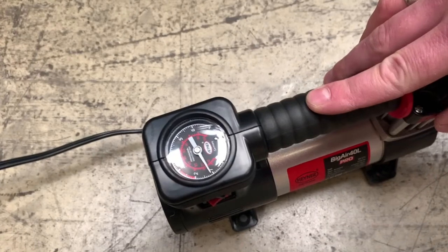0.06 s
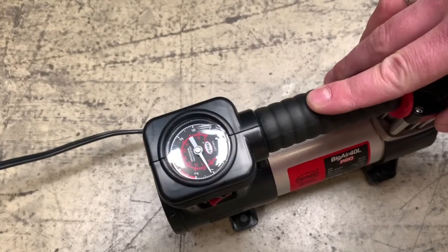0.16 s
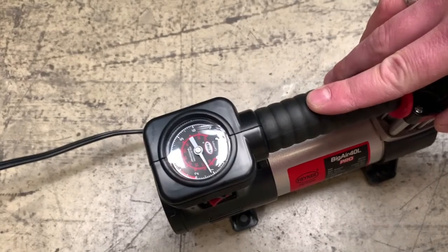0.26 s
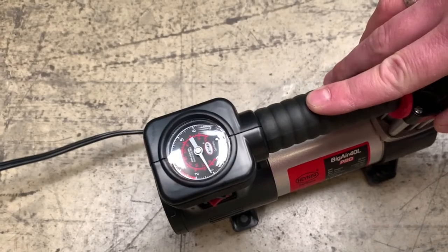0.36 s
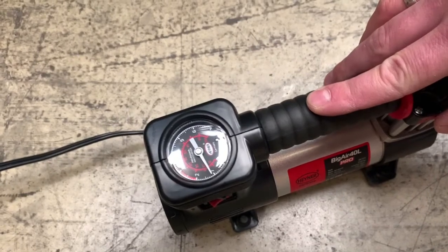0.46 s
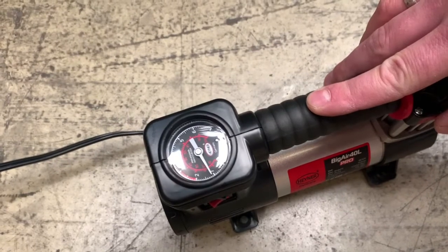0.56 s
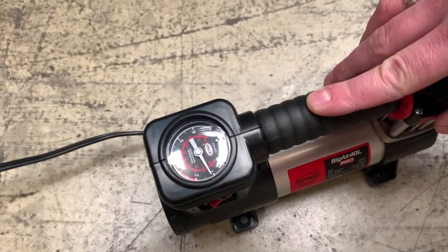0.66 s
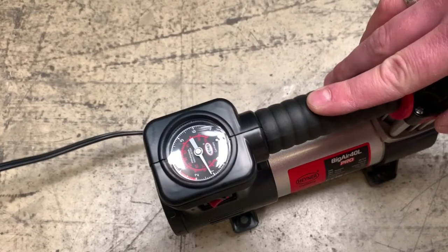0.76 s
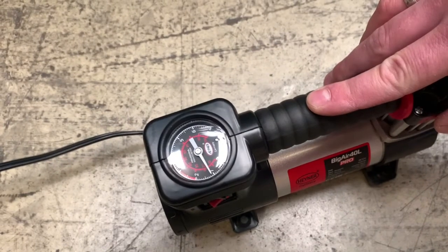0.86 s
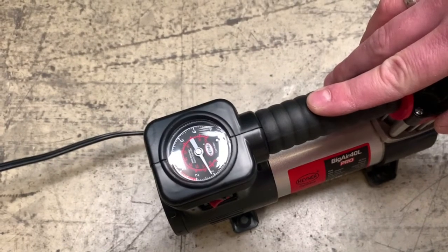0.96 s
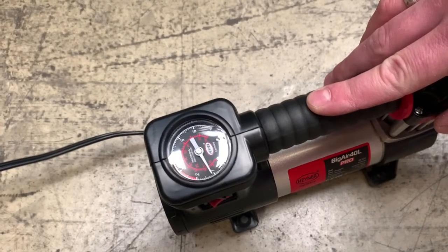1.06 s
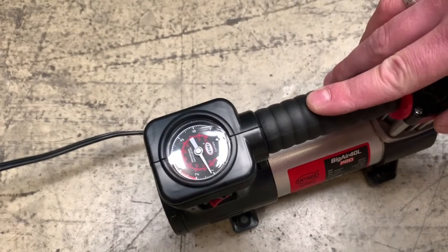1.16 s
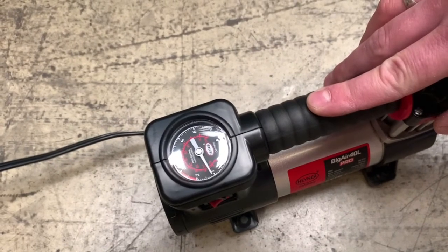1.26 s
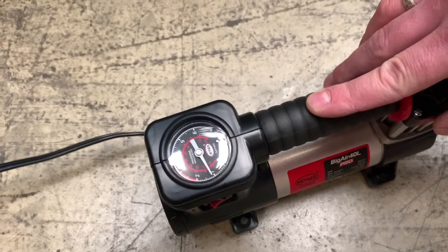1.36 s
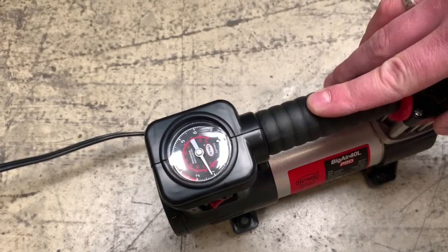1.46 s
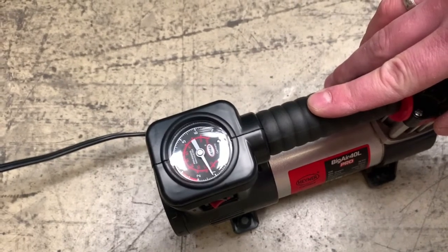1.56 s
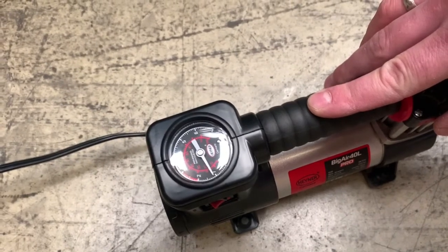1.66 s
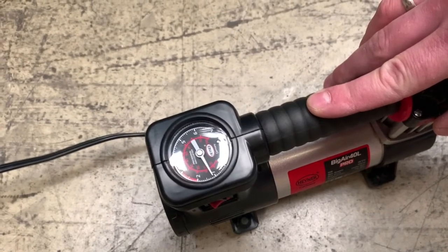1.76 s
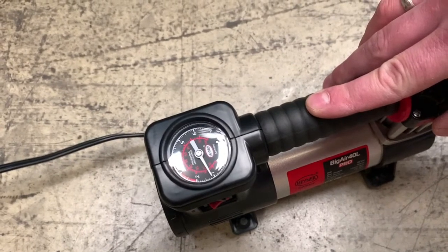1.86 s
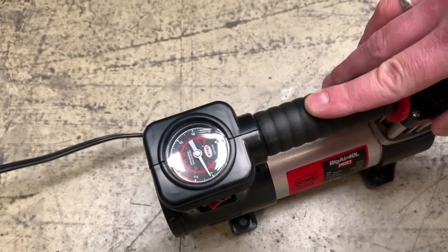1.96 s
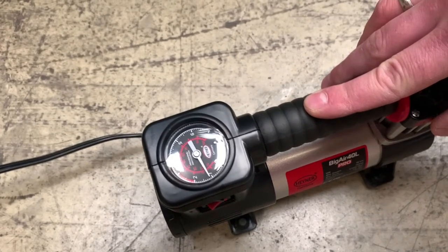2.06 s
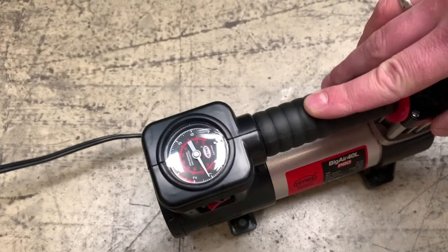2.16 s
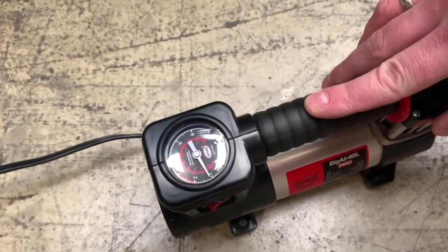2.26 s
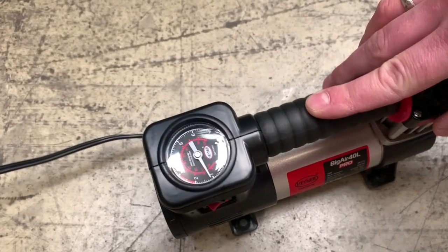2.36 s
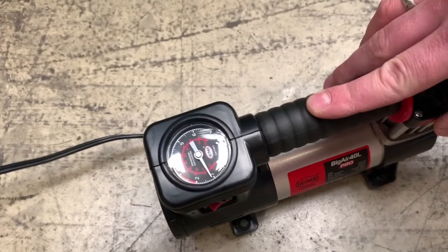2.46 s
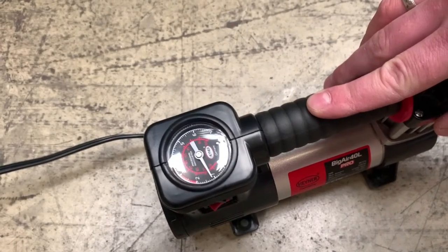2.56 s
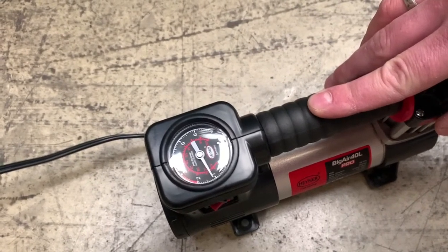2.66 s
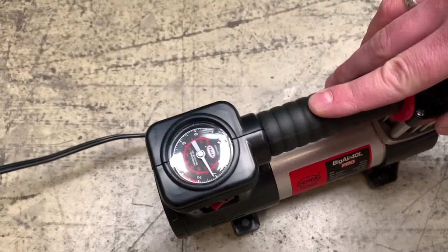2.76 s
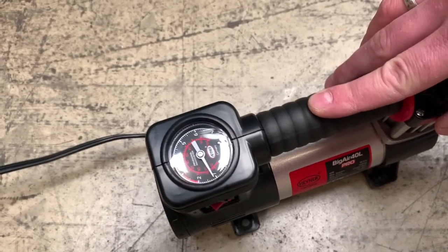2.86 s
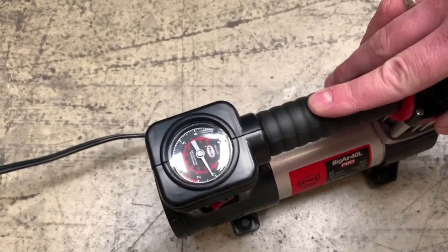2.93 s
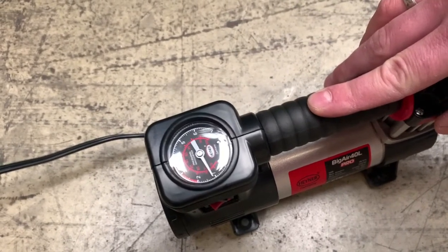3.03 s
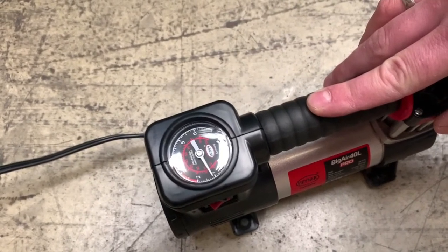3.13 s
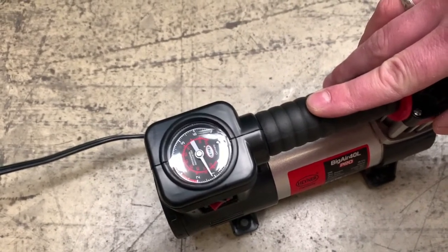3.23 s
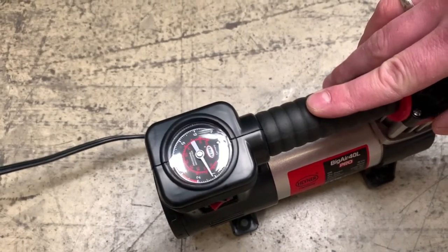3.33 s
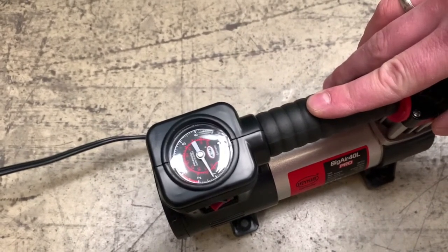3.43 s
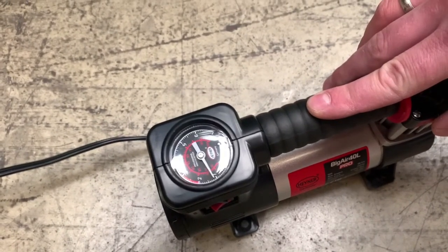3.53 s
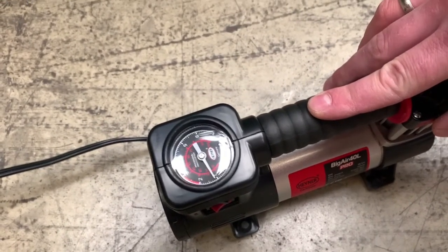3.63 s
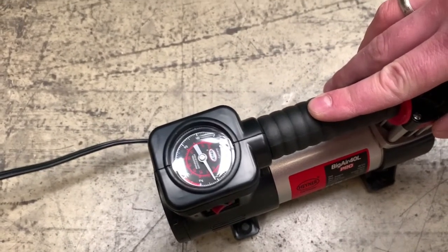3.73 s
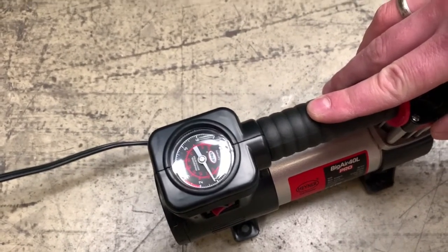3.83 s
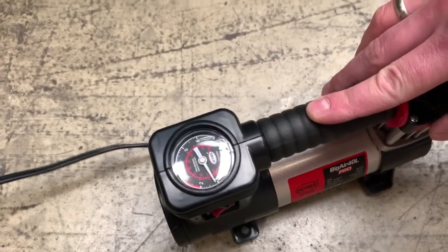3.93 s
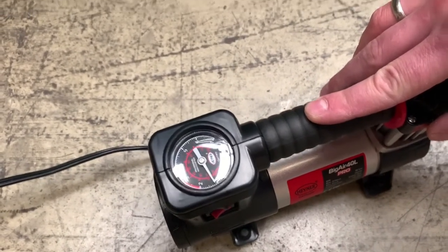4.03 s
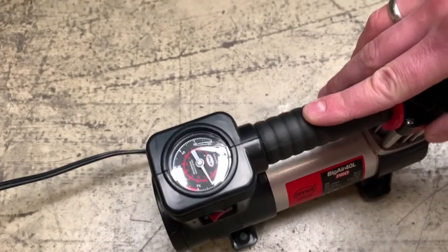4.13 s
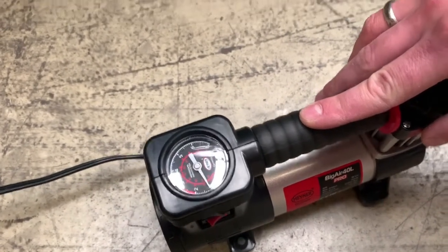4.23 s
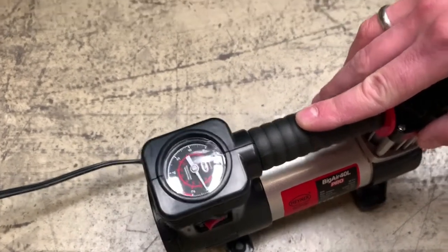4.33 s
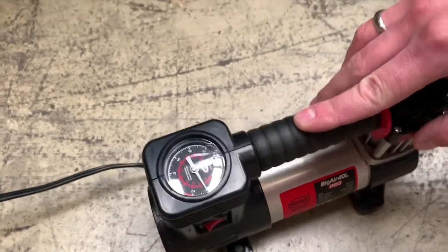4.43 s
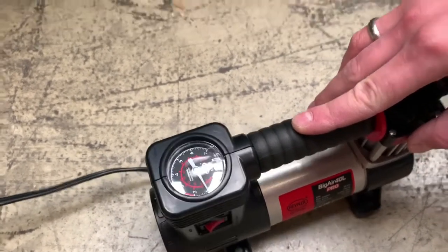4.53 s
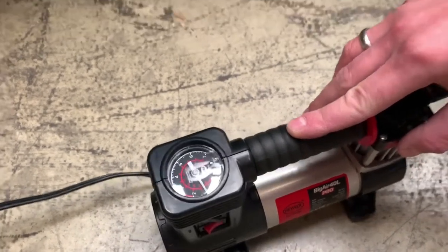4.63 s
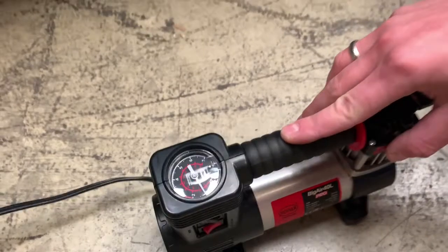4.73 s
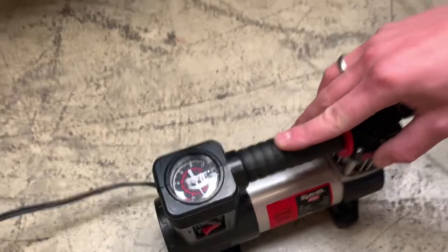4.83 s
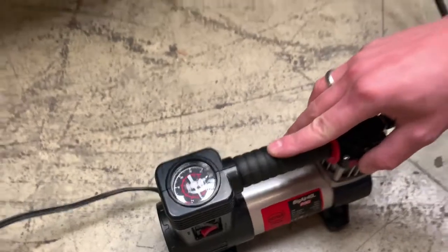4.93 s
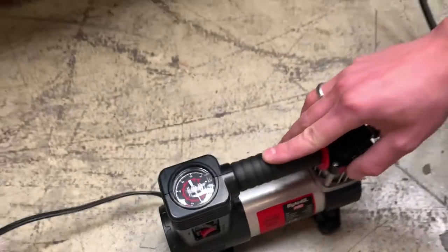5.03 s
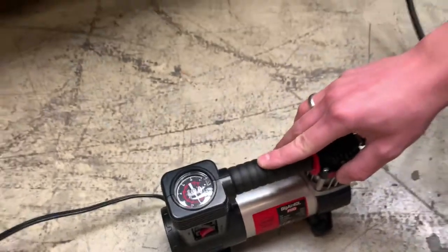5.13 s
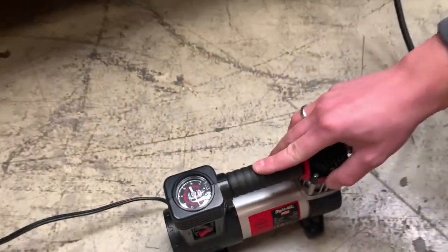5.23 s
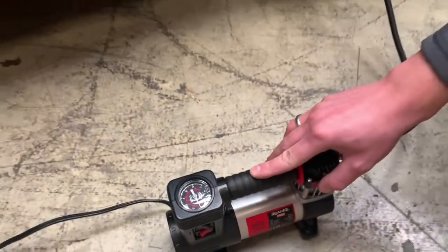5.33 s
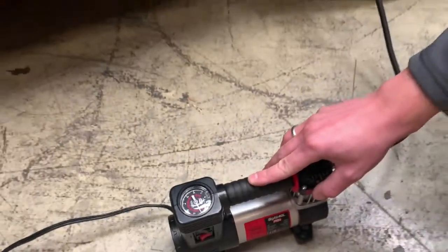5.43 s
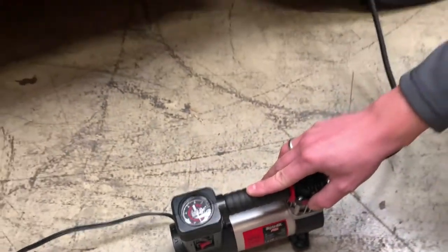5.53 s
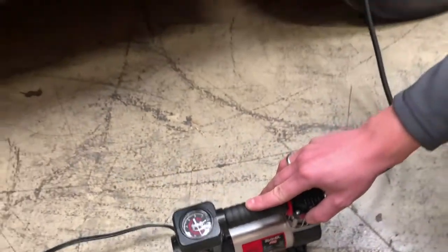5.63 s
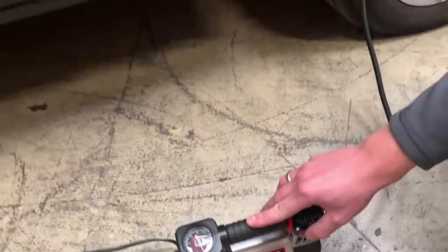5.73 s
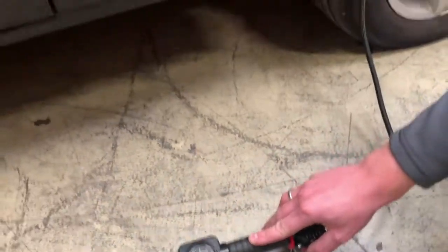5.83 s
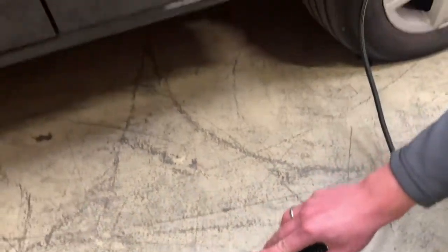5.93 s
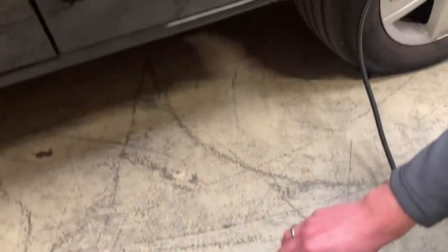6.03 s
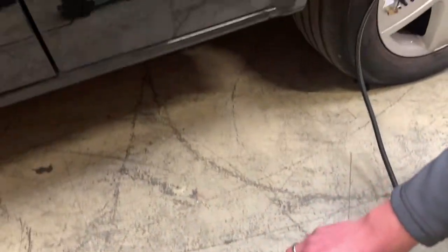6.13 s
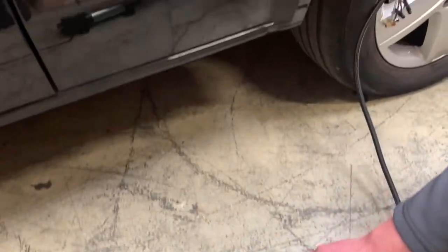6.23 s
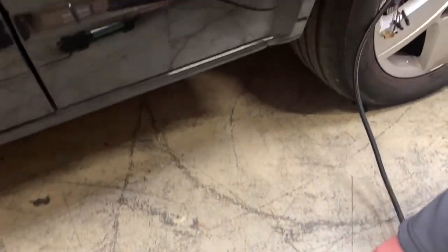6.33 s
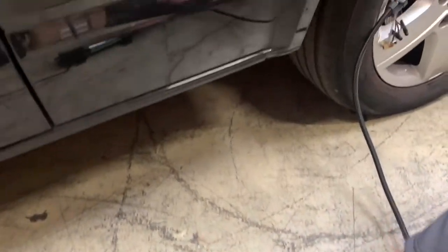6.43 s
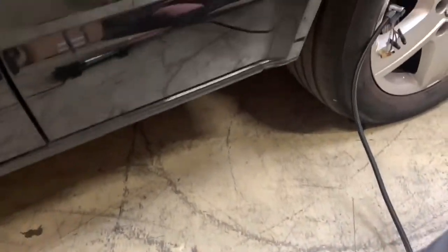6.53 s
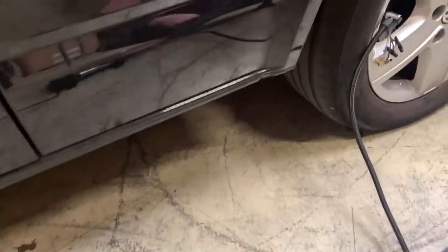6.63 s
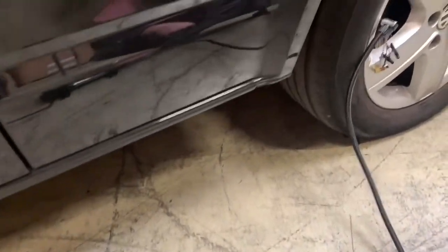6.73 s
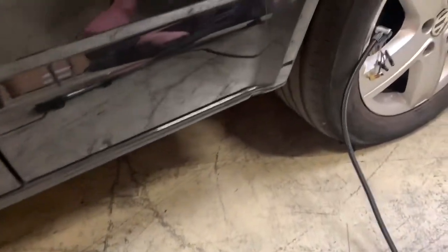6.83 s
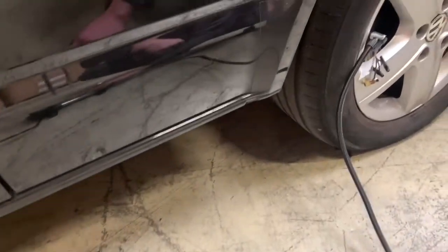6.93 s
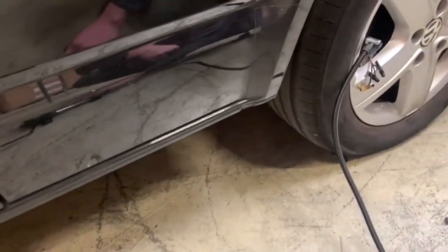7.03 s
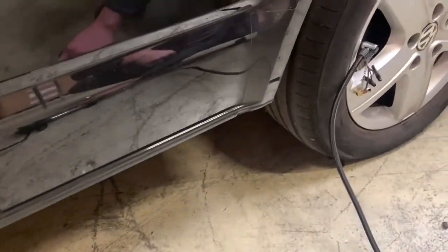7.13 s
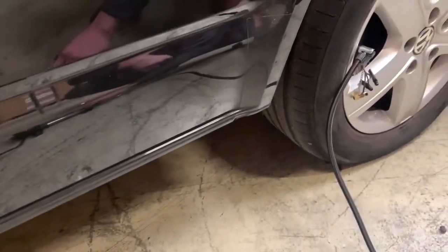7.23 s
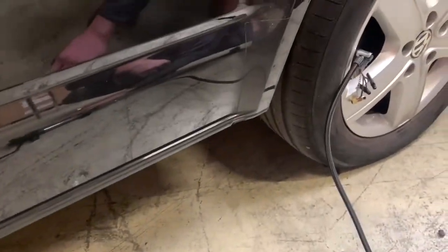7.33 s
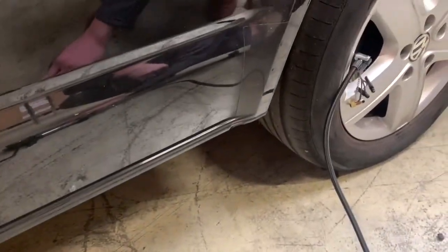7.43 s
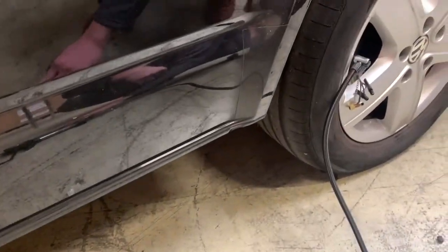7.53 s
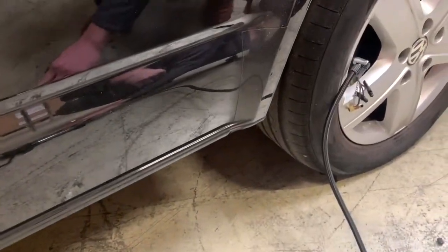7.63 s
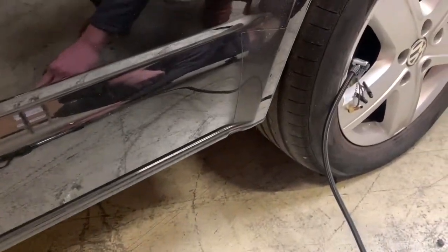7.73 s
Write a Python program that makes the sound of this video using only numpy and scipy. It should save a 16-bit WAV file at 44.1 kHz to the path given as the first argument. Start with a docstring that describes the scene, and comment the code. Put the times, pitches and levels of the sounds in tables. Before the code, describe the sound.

A small piston air compressor is already running on a concrete garage floor, heard close. Its strokes blur into a rough, rapid buzzing drone with metallic rattle, reedy chirps, squeaks, a thin whine and hissing air. After about four seconds the microphone lifts and turns toward the tyre; the pump continues unbroken but sounds quieter, with less close knocking and a changed whine.

```python
"""From the first moment a small piston compressor pumps up a van tyre on a garage floor, about 43 strokes a second.
Crank multiples form the drone and whine; each stroke chirps the reed upward, squeaks the seal, knocks metal
ringing and lets shaped-noise air hiss. The motor slows slightly as the tyre fills.
From 4.4 s the microphone rises from beside the pump, then turns toward the tyre, settling by 7 s:
levels, tone and floor echo shift with it."""
import sys
import numpy as np
from scipy import signal
from scipy.fft import rfft, irfft
from scipy.io import wavfile
from scipy.ndimage import uniform_filter1d

SR = 44100
rng = np.random.default_rng(int(sys.argv[2]) if len(sys.argv) > 2 else 0)


def log_audio(samples):
    """Write samples as a 16-bit WAV file to the path given in sys.argv[1]."""
    # one column per channel
    frames = np.atleast_2d(samples).T
    # limit to full scale, then quantise
    limited = np.clip(frames, -1, 1)
    pcm = np.round(limited * 32767).astype(np.int16)
    wavfile.write(sys.argv[1], SR, pcm)


N = 343092
T = np.arange(N) / SR
BINS = np.fft.rfftfreq(N, 1 / SR)

# Motor speed before hunting. Each row: time in seconds, speed in turns a second.
MOTOR_SPEED = [(0.0, 43.728), (1.31, 43.721), (2.04, 43.42), (2.39, 43.652), (2.85, 43.525), (4.31, 43.49),
               (4.43, 43.297), (5.27, 43.399), (5.7, 43.17), (6.33, 43.451), (7.48, 43.162), (7.78, 42.967)]
# Microphone path. Each row: time in seconds, place from 0 beside the pump to 1 at the tyre, floor echo lag in ms.
MIC_PATH = [(4.4, 0, 1.6), (5.0, 0, 1.44), (5.55, 0.3, 1.36), (6.0, 0.53, 1.23), (6.3, 0.63, 1.08),
            (6.6, 0.97, 0.93), (7.0, 1, 0.83), (7.78, 1, 0.79)]
# Microphone backing off. Each row: time in seconds, distance as a multiple of the first.
MIC_DISTANCE = [(4.4, 1), (5.05, 1.16), (5.85, 1.95), (7.0, 1.8)]
# Drone balance. Each row: multiple of the crank speed, relative level in dB beside the pump, the same at the tyre.
DRONE_LINES = [(1, -38, -44), (2, -33, -37), (3, -48, -54), (4, -42, -47), (5, -56, -56), (6, -70, -65),
               (7, -55, -63), (8, -47, -51), (9, -41, -46), (10, -38, -42), (11, -40, -56), (12, -35, -56),
               (13, -59, -65), (14, -38, -55), (15, -31, -53), (16, -33, -42), (17, -34, -44),
               (18, -37, -44), (19, -42, -48), (20, -57, -53), (21, -58, -55), (22, -45, -47),
               (23, -49, -50), (24, -42, -49), (25, -46, -50), (26, -42, -50), (27, -41, -41),
               (28, -44, -43), (29, -44, -46), (30, -45, -43)]
# Knock level as the microphone moves. Each row: time in seconds, level in dB.
KNOCK_LEVEL_PATH = [(4.4, -25.5), (5.05, -29.5), (5.75, -27), (6.45, -30.5), (6.9, -35.5), (7.78, -37.5)]
# Whine pitches, one for each row of levels below, as multiples of the shaft speed.
WHINE_MULTIPLES = [24, 25, 28, 36, 40, 50, 55, 57, 59, 62, 69]
# Whine levels. Each row: level in dB beside the pump, once lifted, half turned, at the tyre.
WHINE_LEVELS = [(-49, -51, -37, -67), (-34.5, -35, -40.5, -34.5), (-54, -42, -38.5, -29),
                (-43.5, -54, -41.5, -40.5), (-55.5, -54, -52, -53), (-51.5, -52, -61, -40),
                (-51.5, -69, -65, -78), (-56, -75, -41, -57), (-71, -73, -57, -60), (-50, -62, -59, -54),
                (-54, -69, -59, -68)]
# Air flow and brush scrape through a turn. Each row: crank angle in turns, relative level in dB.
AIR_FLOW = [(.03, 2), (.11, 6.5), (.2, 3.5), (.3, 4.5), (.42, 2), (.55, 5.5), (.62, 8.5), (.68, 11.5),
            (.76, 6), (.88, 8.5)]
# Spectrum of the hiss and scrape. Each row: frequency in Hz, relative level in dB per Hz.
AIR_COLOUR = [(400, -10), (1500, 9.5), (2500, 12.5), (2850, 4), (3150, 6.5), (3500, -3.5), (4100, 5),
              (4530, 0), (4900, 6), (5400, -5), (6400, 1), (7400, 2.5), (8600, -3), (9800, -45),
              (16000, -35)]
# Spectrum of the finest hiss of escaping air. Each row: frequency in Hz, relative level in dB per Hz.
FIZZ_COLOUR = [(6000, -32), (10000, -19), (11700, 5), (13500, 1.5), (15000, -10), (16000, 4.5)]
# Spectrum of the steady rumble. Each row: frequency in Hz, relative level in dB per Hz.
RUMBLE_COLOUR = [(4, -30), (22, -5), (60, 11), (110, 2), (170, -4.5), (260, -7), (450, 5.5), (700, 23),
                 (880, 8), (1100, 6), (2000, -47)]
# Reverberation of the garage. Each row: frequency in Hz, time to fall 60 dB in seconds.
GARAGE_DECAY = [(200, 0.098), (1200, 1), (4000, 0.063), (12000, 0.0083)]
# Piston slap. Each row: crank angle in turns, relative level in dB.
SLAP_BLOWS = [(0.69, 0)]
# Short bark of the cylinder wall. Each row: frequency in Hz, width in Hz, relative dB beside the pump, at the tyre.
WALL_MODES = [(1640, 120, -44, 6), (1820, 203, 27, 6), (2110, 75, 5.5, -6)]
# Knocks on the housing. Each row: crank angle in turns, relative level in dB.
HOUSING_BLOWS = [(0.068, -31), (0.17, 0), (0.248, -14), (0.654, 10), (0.71, 6), (0.801, 13)]
# Ring of the metal housing. Each row: frequency in Hz, width in Hz, relative dB beside the pump, at the tyre.
HOUSING_MODES = [(1572, 52, 0, 10), (1738, 10, 1.5, -9), (2185, 33, -8, 4.5), (2492, 61, 6, -22),
                 (2714, 7.9, 5.5, 10), (2800, 50, -27, -24), (3057, 22, -8, -17), (3290, 20, -14.5, -12)]
# Valves snapping onto their seats. Each row: crank angle in turns, relative level in dB.
VALVE_SNAPS = [(0.09, 10), (0.16, 4.5), (0.685, 6)]
# Ring of the cylinder head. Each row: frequency in Hz, width in Hz, relative dB beside the pump, at the tyre.
HEAD_MODES = [(4080, 220, 1, 16), (4280, 320, 10, 6), (4760, 100, 12.5, -2), (4800, 230, 1, 10)]
# Valve tips ticking on their stops. Each row: crank angle in turns, relative level in dB.
TIP_BLOWS = [(.098, 3), (.66, 6), (0.749, -2)]
# Ring of the thin valve steel. Each row: frequency in Hz, width in Hz, relative dB beside the pump, at the tyre.
STEEL_MODES = [(6470, 200, -16, 4), (6870, 87, 13, 12), (7300, 130, 15, -10), (7700, 170, -7, -15)]
# Seal squeaks. Each row: crank angle in turns, half length in turns, mid pitch in Hz, glide in Hz per turn,
# level in dB beside the pump, once lifted, half turned, at the tyre.
SEAL_SQUEAKS = [(.11, .06, 2440, 0, -32, -41, -37, -42), (.24, .06, 2420, 0, -33, -42, -39, -45),
                (.67, .045, 2180, 6000, -32, -26.5, -28, -23.5), (.71, .04, 2500, 4000, -28, -33, -27, -32),
                (.80, .045, 2400, -500, -29, -35, -32, -39)]
# One reed flutter, before stroke-to-stroke variation. Each row: crank angle in turns, pitch in Hz, relative dB.
REED_FLUTTER = [(0.35, 800, -20), (0.409, 964, 2), (0.469, 1176, 0.5), (0.529, 1186, 4), (0.582, 1515, -2),
                (0.621, 1476, 3.5), (0.651, 1499, -36)]
# Strokes on which the reed flutters hardest. Each row: time in seconds, extra level in dB at the peak.
HARD_FLUTTERS = [(0.123, 5.5), (0.488, 6), (0.649, 7), (0.969, 4), (1.61, 4), (2.208, 6.5), (2.323, 5),
                 (2.415, 4.5), (2.574, 7), (2.735, 6), (2.827, 4.5), (4.16, 5.5), (4.23, 4), (5.175, 4.5),
                 (5.336, 4.5), (5.406, 3.5), (5.451, 3.5), (5.728, 3.5), (6.144, 5), (6.168, 4), (6.652, 4),
                 (6.86, 4.5), (6.904, 4), (7.275, 2.5), (7.299, 4), (7.392, 3), (7.53, 3), (7.577, 2.5),
                 (7.67, 4)]
# Colour heard above the pump rather than beside it. Each row: frequency in Hz, gain in dB.
OVERHEAD_COLOUR = [(900, -0.5), (1300, -1), (1750, 1), (2150, 5.5), (2550, -3.5), (2900, -1.5),
                   (3700, -0.5), (4900, 1), (5700, 4), (8000, 0.5)]
# Difference between the two channels. Each row: frequency in Hz, level in dB against their sum, phase in
# radians.
PORT_DIFFERENCE = [(44, -16, -2), (90, -9, -1.6), (180, 0.5, -1.5), (230, 17.5, -3), (320, 8.5, 1.5),
                   (419, -6, 1.5), (497, -46, 12), (620, -5, -0.93), (970, -17, -0.7), (1300, -6, -1.32),
                   (2370, 4.5, -1.05), (2240, 2, 1.6), (4640, 0.5, 0.85), (8100, -4, 1.83), (9440, 22, 1.3),
                   (12700, -14.5, 1.7)]
# How each part carries. Each row: level in dB beside the pump, dB lost per doubling of distance,
# dB gained once turned to the tyre.
HUM_CARRY = (-31.5, 5.4, 0.34)
BODY_CARRY = (-31, 7.3, -1.5)
OVERTONE_CARRY = (-35.5, 7.5, 3)
HISS_CARRY = (-37.5, 4.5, -0.79)
SLAP_CARRY = (-42.5, 15, 0)
CLATTER_CARRY = (-44, 8, 0.85)
SNAP_CARRY = (-49, 3, -0.92)
TIP_CARRY = (-53, 7.1, -1.3)
VALVE_CARRY = (-28, 6, 2.6)

START_TURN, HUNTING = 0.1555, 0.004  # crank position at the start, rms drift around the steady turning (turns)
TOP_ANGLE = 0.7  # crank angle at which the piston tops out (turns)
HARD_ANGLE, HARD_WIDTH = 0.506, 0.095  # peak and spread of a hard flutter (turns)
HARD_SHARP = 0.05  # share by which pitch rises at that peak
LIFTED_AT = 1.32  # distance multiple at which the microphone is clear of the housing
BLOW_ECHO_NEAR, BLOW_ECHO_LIFTED = 0.1, 0.62  # floor echo gain for the reed and blows
BODY_ECHO, HISS_ECHO, SQUEAK_ECHO = 0.33, 0.078, 0.75  # floor echo gains once lifted
HISS_SPREAD = 0.35  # gain of the hiss that is opposite in the two channels
ROOM_DB, RUMBLE_DB = -16.5, -31.5  # garage tail; rumble beside the pump
EDGE_HZ = 15800


def amp(db):
    """Decibels to gain."""
    return 10 ** (np.asarray(db) / 20)


def evened(x):
    """Scales to an rms of one."""
    return x / np.sqrt(np.mean(x ** 2) + 1e-20)


def curves(rows):
    """Each column of a timed table, sample by sample."""
    seconds, *columns = np.transpose(rows)
    return [np.interp(T, seconds, column) for column in columns]


def read(points, hz):
    """Reads a spectrum on a log-frequency axis."""
    f, value = np.transpose(points)
    return np.interp(np.log(hz + 1), np.log(f + 1), value)


def coloured(x, spectrum):
    """Filters sound by a gain curve in dB."""
    return irfft(rfft(x) * amp(read(spectrum, BINS)), N)


def noise(spectrum):
    """Coloured noise, unrelated in the two channels."""
    return evened(coloured(rng.standard_normal((2, N)), spectrum))


def per_turn(turns):
    """One normal random value for each turn of the crank."""
    return rng.standard_normal(N // 100)[np.floor(turns).astype(int) + 1]


def waver(turns):
    """A smooth random value that changes about once a turn."""
    return evened(uniform_filter1d(per_turn(turns), size=400))


def at_stage(stage, levels_db):
    """Level in dB between beside the pump (0), lifted (1), half turned (2) and at the tyre (3)."""
    return np.interp(stage, np.arange(len(levels_db)), levels_db)


def carried(part, distance, turned):
    """Gain of one part at the microphone: it falls with distance and changes with direction."""
    near_db, loss_db, turn_db = part
    return amp(near_db - loss_db * np.log2(distance) + turn_db * turned)


def floor_echo(x, lag_ms, share):
    """The concrete adds a close echo whose lag shrinks as the microphone moves."""
    echo = np.interp(T - lag_ms / 1000, T, x)
    return (x + share * echo) / np.sqrt(1 + share ** 2)


def overhead(x, lifted):
    """Blends toward the colour that the pump radiates upward."""
    return x + lifted * (coloured(x, OVERHEAD_COLOUR) - x)


def garage(x):
    """A diffuse tail for each channel, the treble dying first."""
    taps = rng.standard_normal((2, SR // 2)) * (T[:SR // 2] > .004)
    hz, t, grains = signal.stft(taps, SR, nperseg=256)
    decay = np.exp(-np.log(1000) * t / read(GARAGE_DECAY, hz)[:, None])
    tail = signal.istft(grains * decay, SR, nperseg=256)[1]
    tail /= np.linalg.norm(tail[0])
    return signal.fftconvolve(x[None], tail, axes=1)[:, :N]


def rumble(lag_ms, share):
    """Steady coloured noise, unrelated in the two channels, reflected by the floor."""
    return np.array([floor_echo(side, lag_ms, share) for side in noise(RUMBLE_COLOUR)])


def crank_turns():
    """Turns of the crank so far; the motor hunts slightly around its speed."""
    steady = START_TURN + np.cumsum(curves(MOTOR_SPEED)[0]) / SR
    hunting = uniform_filter1d(uniform_filter1d(per_turn(steady), size=3500), size=3500)
    return steady + HUNTING * evened(hunting)


def drone(turns, away, orders, angle, shake_db):
    """Some multiples of the crank speed, phased as the ringing that follows a push at one crank angle."""
    order, near_db, far_db = np.transpose(DRONE_LINES)
    multiple = abs(np.fft.fftfreq(128) * 128)
    band_db = np.where(np.isin(multiple, orders), np.interp(multiple, order, near_db), -58)
    phase = -signal.hilbert(np.log(amp(band_db))).imag  # minimum phase
    gains = [amp(near_db[k - 1] + away * (far_db[k - 1] - near_db[k - 1])) for k in orders]
    lines = np.zeros(N)
    for k, gain in zip(orders, gains):
        lines += gain * np.cos(2 * np.pi * k * (turns - angle) + phase[k])
    steady = lines / np.linalg.norm(gains, axis=0)
    return evened(steady * amp(shake_db * waver(turns)))


def whine(turns, stage, shake_db=1.2, dip=.7, dip_width=.08):
    """Multiples of the shaft speed sing on, each loudest in its own direction; they ease off once a turn."""
    lines = np.zeros(N)
    for order, levels_db in zip(WHINE_MULTIPLES, WHINE_LEVELS):
        tone = evened(np.sin(2 * np.pi * order * turns) * amp(shake_db * waver(turns)))
        lines += amp(at_stage(stage, levels_db)) * tone
    from_turn_start = (turns + .5) % 1 - .5
    return lines * (1 - dip * np.exp(-(from_turn_start / dip_width) ** 2))


def air(turns, away, shake_db=1.0, fizz_db=-9.5, dull_db=2.0, fizz_surge=0.77):
    """Hiss and scrape surge through each turn; the finest fizz is steadier and fades toward the tyre."""
    angle, db = np.transpose(AIR_FLOW)
    surge_db = np.interp(turns, angle, db, period=1) + shake_db * waver(turns)
    flow = noise(AIR_COLOUR) * amp(surge_db)
    fizz = noise(FIZZ_COLOUR) * amp(fizz_surge * surge_db)
    return evened(flow + amp(fizz_db - dull_db * away) * fizz)


def clatter(turns, away, blows, modes, loose, shake_db, size):
    """A few blows a turn, each slightly early or late and size samples long, ring a metal part."""
    count, clicks = np.arange(int(turns[-1]) + 1), np.zeros(N)
    for angle, db in blows:
        slip, strength = rng.standard_normal((len(count), 2)).T
        at = np.searchsorted(turns, count + angle + loose * slip)
        inside = (at > 0) & (at < N)
        clicks[at[inside]] += amp(db + shake_db * strength[inside])
    clicks = uniform_filter1d(clicks, size=size)
    hz, width, near_db, far_db = np.transpose(modes)[:, :, None]
    t = T[:2048]
    rings = np.sqrt(width) * np.exp(-np.pi * width * t) * np.sin(2 * np.pi * hz * t)
    near = evened(signal.oaconvolve(clicks, (amp(near_db) * rings).sum(0))[:N])
    far = evened(signal.oaconvolve(clicks, (amp(far_db) * rings).sum(0))[:N])
    return (1 - away) * near + away * far


def seal(turns, stage, shake_db=.8):
    """The piston seal gives short gliding squeaks, nearly the same on every stroke."""
    speed, = curves(MOTOR_SPEED)
    out = np.zeros(N)
    for angle, width, hz, glide, *levels_db in SEAL_SQUEAKS:
        since = (turns - angle + .5) % 1 - .5
        swings = (hz * since + glide * since ** 2 / 2) / speed
        level_db = at_stage(stage, levels_db) + shake_db * per_turn(turns - angle + .5)
        out += amp(level_db) * np.exp(-(since / width) ** 2) * np.sin(2 * np.pi * swings)
    return out


def valve(turns, late=0.009, detune=0.046, shake_db=1.3, rough=0.08):
    """The reed flutters faster as pressure climbs; it lifts a little earlier or later each stroke."""
    angle, hz, db = np.transpose(REED_FLUTTER)
    stroke = np.floor(turns)
    extra_db = sum(gain_db * (stroke == stroke[round(s * SR)]) for s, gain_db in HARD_FLUTTERS)
    burst = np.exp(-((turns % 1 - HARD_ANGLE) / HARD_WIDTH) ** 2)
    hard = burst * (extra_db > 0)
    crank = turns % 1 + late * per_turn(turns)
    pitch_hz = np.interp(crank, angle, hz) * (1 + HARD_SHARP * hard + detune * per_turn(turns))
    is_open = (crank > angle[0]) & (crank < angle[-1])
    swings = np.cumsum(pitch_hz) / SR
    swings -= np.interp(stroke + TOP_ANGLE, turns, swings)  # each flutter is in step with the piston at the top
    grit = 1 + rough * evened(uniform_filter1d(rng.standard_normal(N), size=30))
    level_db = np.interp(crank, angle, db) + extra_db * burst
    level_db += shake_db * (2 - hard) * per_turn(turns)  # hard flutters vary less
    return evened(is_open * amp(level_db) * grit * np.sin(2 * np.pi * swings))


def ports(x):
    """Two microphone ports hear the same wave with different phase and level."""
    hz, db, radians = np.transpose(PORT_DIFFERENCE)
    turn = np.exp(1j * read(np.c_[hz, radians], BINS))
    side = irfft(rfft(x) * amp(read(np.c_[hz, db], BINS)) * turn, N)
    return np.array([x + side, x - side])


def scene():
    """One crank drives every layer but the rumble; the place of the microphone sets how loud each is."""
    turns = crank_turns()
    distance, = curves(MIC_DISTANCE)
    away, lag_ms = curves(MIC_PATH)
    lifted = np.interp(distance, [1, LIFTED_AT], [0, 1])
    turned = away ** 2  # the turn comes mostly after the rise
    stage = lifted + 2 * away
    place = distance, turned

    hum = carried(HUM_CARRY, *place) * drone(turns, away, range(1, 7), angle=0.567, shake_db=0.35)
    body = carried(BODY_CARRY, *place) * drone(turns, away, range(7, 14), angle=0.85, shake_db=0.33)
    knock_gain = amp(curves(KNOCK_LEVEL_PATH)[0])
    knock = knock_gain * drone(turns, turned, range(14, 22), angle=.66, shake_db=0.02)
    ring = carried(OVERTONE_CARRY, *place) * drone(turns, away, range(22, 31), angle=0.1232, shake_db=2.0)
    hiss, scatter = carried(HISS_CARRY, *place) * air(turns, away)

    slap = clatter(turns, lifted, SLAP_BLOWS, WALL_MODES, loose=.0003, shake_db=.7, size=9)
    metal = clatter(turns, lifted, HOUSING_BLOWS, HOUSING_MODES, loose=.0005, shake_db=.7, size=7)
    snaps = clatter(turns, lifted, VALVE_SNAPS, HEAD_MODES, loose=.0006, shake_db=.8, size=1)
    tips = clatter(turns, lifted, TIP_BLOWS, STEEL_MODES, loose=.0008, shake_db=1, size=1)
    blows = carried(SLAP_CARRY, *place) * slap + carried(CLATTER_CARRY, *place) * metal
    blows += carried(SNAP_CARRY, *place) * snaps + carried(TIP_CARRY, *place) * tips
    blows += carried(VALVE_CARRY, *place) * valve(turns)
    squeak = seal(turns, stage)

    blow_echo = BLOW_ECHO_NEAR + lifted * (BLOW_ECHO_LIFTED - BLOW_ECHO_NEAR)
    strokes = floor_echo(blows, lag_ms, blow_echo) + floor_echo(hiss, lag_ms, HISS_ECHO * lifted)
    direct = hum + floor_echo(body, lag_ms, BODY_ECHO * lifted) + knock + ring
    direct += whine(turns, stage) + overhead(strokes, lifted)
    direct += floor_echo(squeak, lag_ms, SQUEAK_ECHO * lifted)

    room = amp(ROOM_DB) * garage(blows + squeak)
    spread = HISS_SPREAD * np.array([scatter, -scatter])
    low_noise = amp(RUMBLE_DB) / distance * rumble(lag_ms, BODY_ECHO * lifted)
    return ports(direct) + room + spread + low_noise


def record(dry):
    """The recorder's band limit: a steep low-pass filter."""
    low_pass = signal.firwin(511, EDGE_HZ, window=("kaiser", 9), fs=SR)
    return signal.oaconvolve(dry, low_pass[None], "same")


dry = scene()
out = record(dry)
log_audio(out)
```